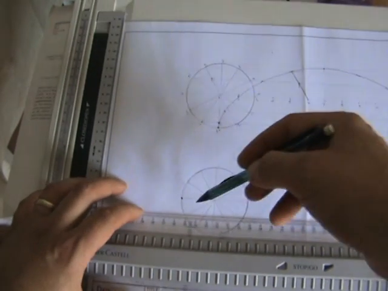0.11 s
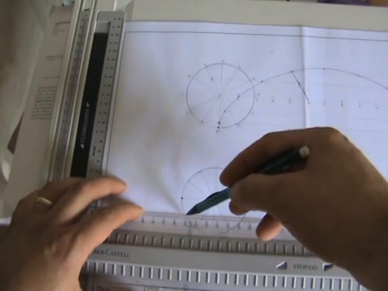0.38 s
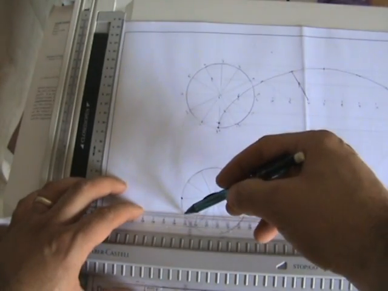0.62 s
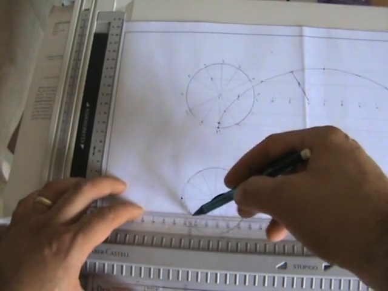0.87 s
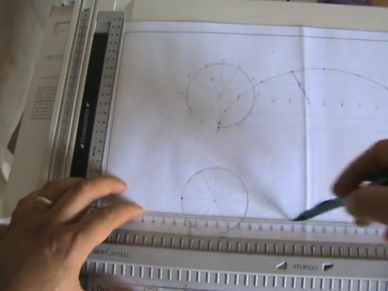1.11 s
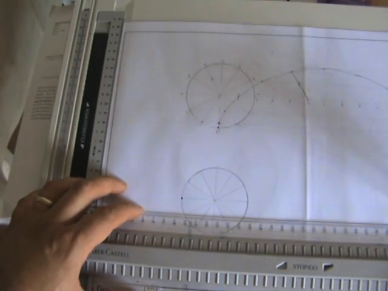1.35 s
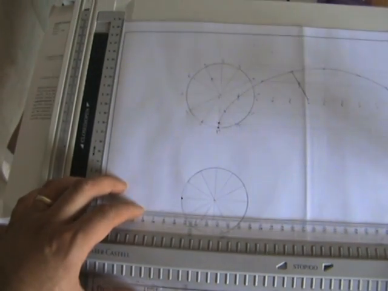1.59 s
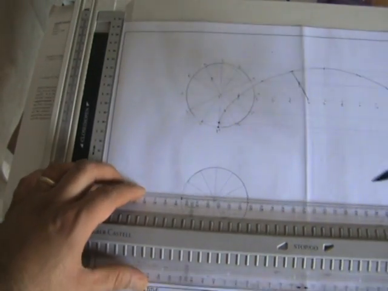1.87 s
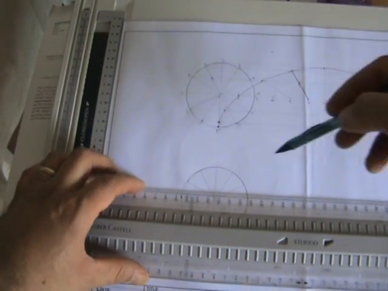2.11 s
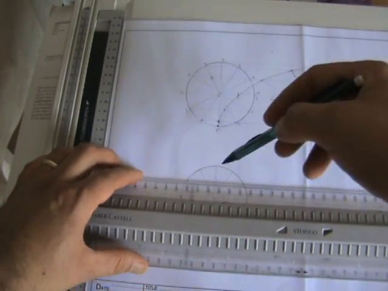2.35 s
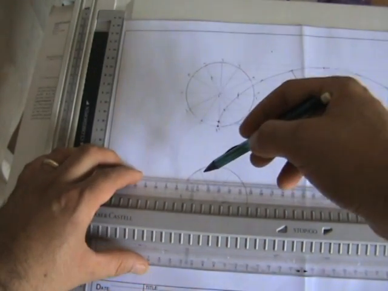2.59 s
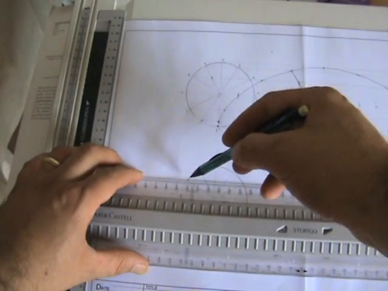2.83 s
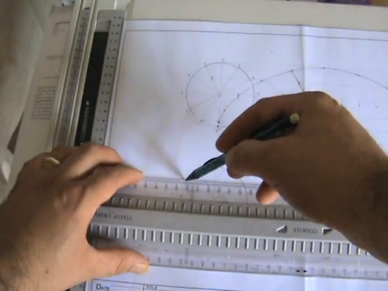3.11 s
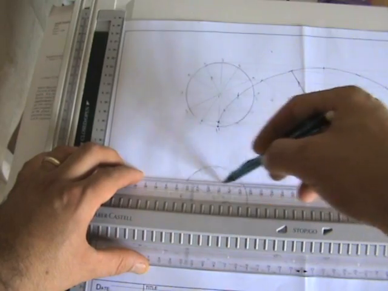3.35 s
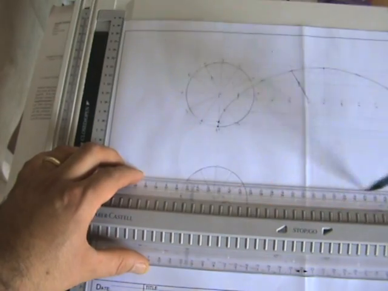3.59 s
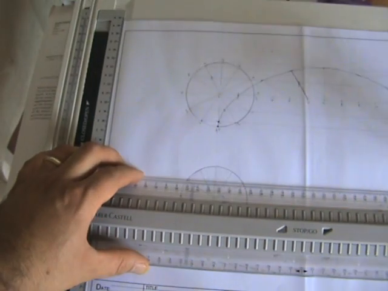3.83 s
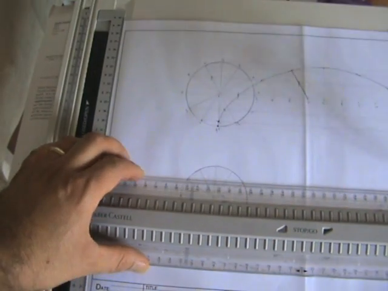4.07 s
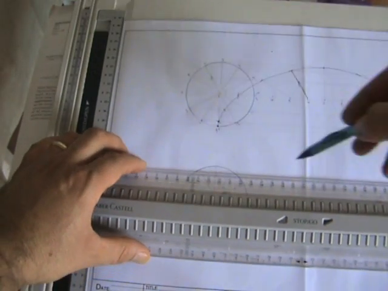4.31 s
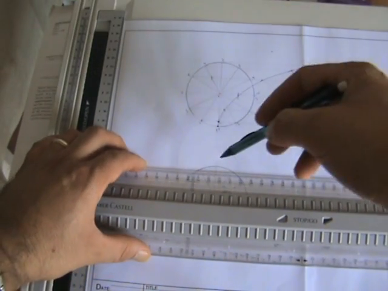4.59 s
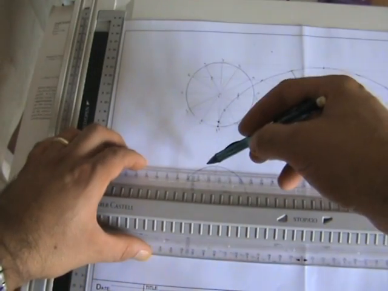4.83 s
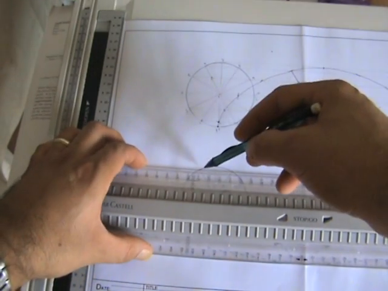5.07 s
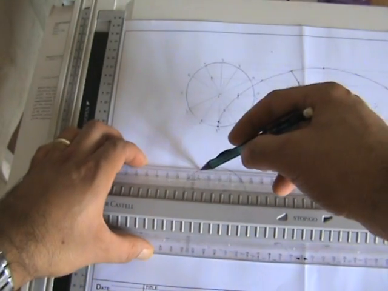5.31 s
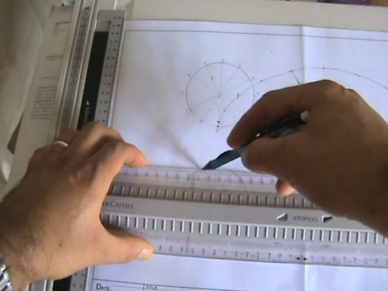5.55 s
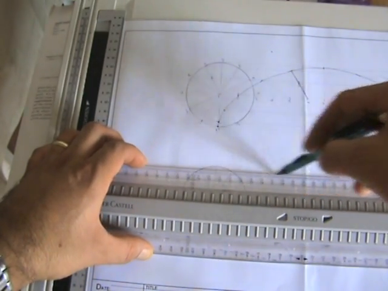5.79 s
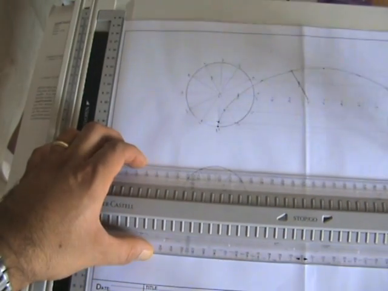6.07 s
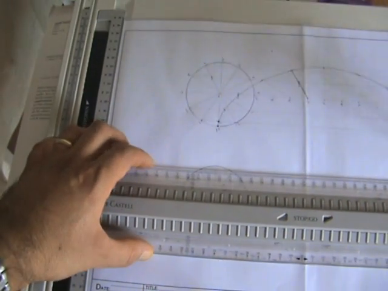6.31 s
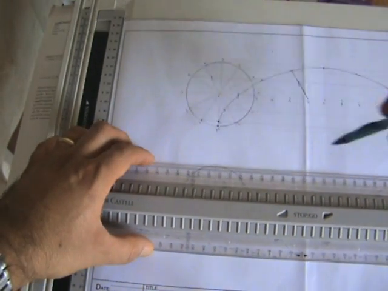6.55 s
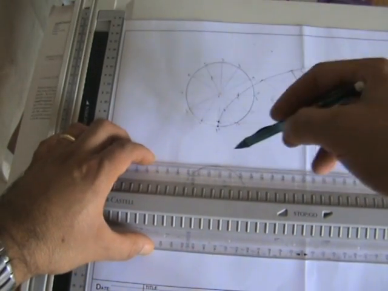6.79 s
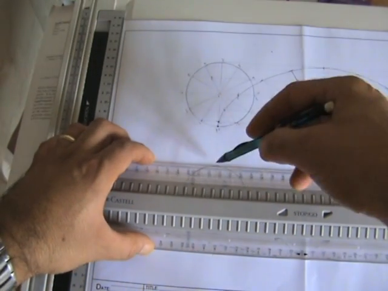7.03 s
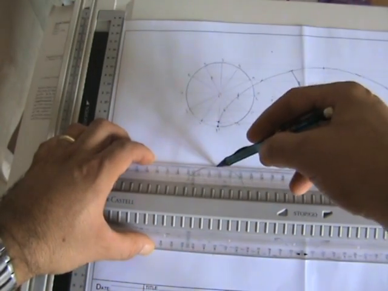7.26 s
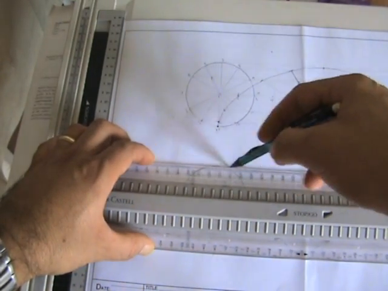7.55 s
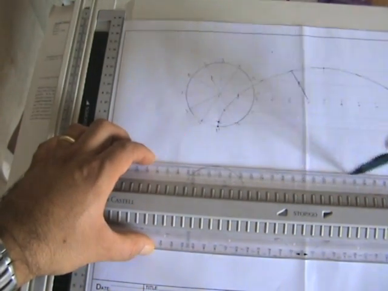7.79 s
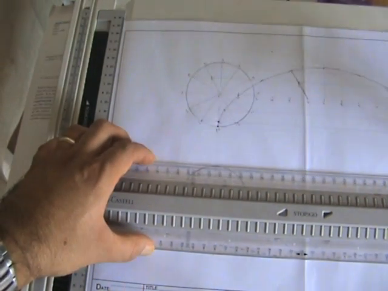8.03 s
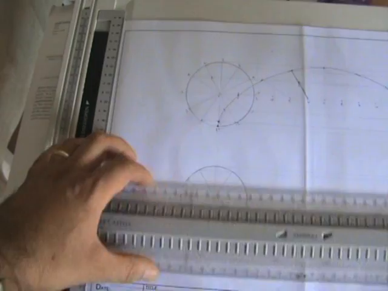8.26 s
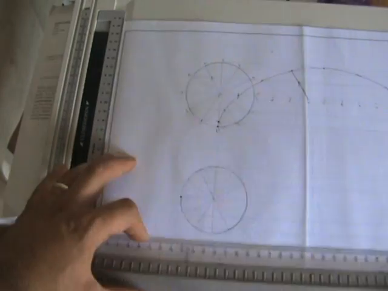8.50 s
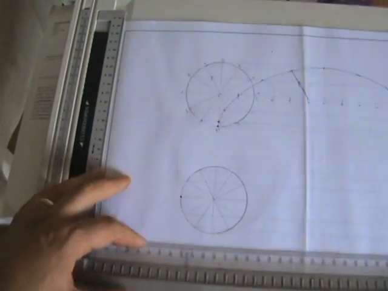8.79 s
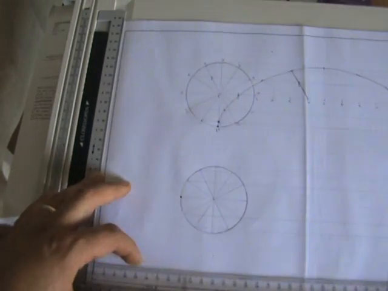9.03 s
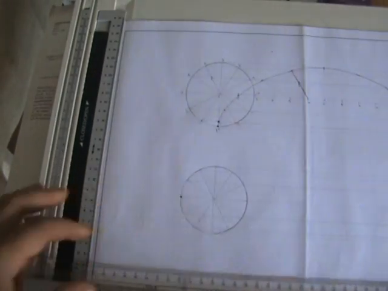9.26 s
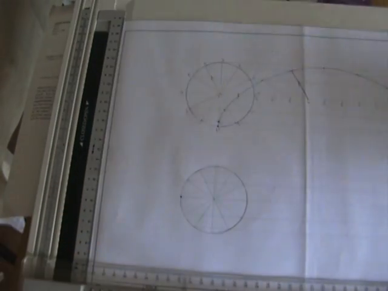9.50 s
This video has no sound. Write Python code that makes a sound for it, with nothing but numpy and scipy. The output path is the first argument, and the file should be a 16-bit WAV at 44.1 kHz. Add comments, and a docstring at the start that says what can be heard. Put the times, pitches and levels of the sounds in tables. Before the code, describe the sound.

In a quiet room, a pencil draws four brisk lines along a plastic ruler, each a grainy hiss with a hollow desk drone. Light ticks, soft rustles and small thumps fill the gaps as ruler and hand shift. Near the end the ruler slides and clatters more loudly. A close camera microphone adds faint motor hum and ticking; a dove coos softly far outside at the start.

```python
"""Pencil lines along a ruler

A pencil is drawn four times along a ruler on a drafting desk: tiny catches of the lead on paper drive desk and hiss.
Hand and ruler slide (more catches), with ticks and knocks (short chatter) and thumps (soft pushes) between them.
A quiet room answers with sparse dying taps. A camera's disc motor hums and ticks, and its lens drive steps.
A dove coos and an engine drones far outside, both made of wavering tones, over still air made of patchy noise."""
import sys
import numpy as np
from scipy import signal
from scipy.fft import rfft, irfft
from scipy.io import wavfile
from scipy.ndimage import uniform_filter1d

SR = 44100
rng = np.random.default_rng(int(sys.argv[2]) if len(sys.argv) > 2 else 0)


def digitize_waveform(pressure):
    """Quantize a signal to 16-bit integers and store it at the path in sys.argv[1].

    Rows of a 2-D input are taken as channels; values are limited to [-1, 1].
    """
    field = np.atleast_2d(pressure).T
    bounded = np.clip(field, -1, 1)
    quanta = np.round(bounded * 32767).astype(np.int16)
    wavfile.write(sys.argv[1], SR, quanta)


def how_loud(loudness_db):
    """Turn decibels into a plain amplitude multiplier (0 dB gives 1, 20 dB gives 10)."""
    steps = np.asarray(loudness_db, float) / 20
    return 10 ** steps


N = 424683

# what the desk top rings with: pitch_hz, width_hz (wider dies sooner), level_db (relative)
DESK = [(345, 53, -2), (423.8, 26.5, 6), (488.5, 60, -4.5), (665.6, 80, -4), (809, 112, -4),
        (914.5, 28.4, -2.5), (1006, 30.6, -5.5), (1256, 290, -16.5), (1530, 107, -21.5), (1850, 660, -36.5)]
# the whole board ringing on its legs: pitch_hz, width_hz, level_db (relative)
BOARD = [(86, 29, -30), (101, 16.6, 0.5), (145, 3.7, -2.5), (183, 28, -3), (253, 8.9, 5), (285, 11, -2)]
DISC_HZ = 31.7  # turns of the camera's disc a second


def evened(x):
    """Scales to rms 1."""
    return x / np.sqrt(np.mean(x ** 2) + 1e-20)


def smooth_noise(count, size):
    """Slowly wandering noise of rms 1: random values averaged twice over size samples."""
    return evened(uniform_filter1d(uniform_filter1d(rng.standard_normal(count), size), size))


def read(points, hz):
    """Reads a spectrum table between its points, on a log-frequency axis."""
    f, value = np.transpose(points)
    return np.interp(np.log(hz + 1), np.log(f + 1), value)


def add(mix, s, sound):
    """Mixes a sound in at time s."""
    part = mix[round(s * SR):][:len(sound)]
    part += sound[:len(part)]


def passed(x, hz, kind):
    """A steep high- or low-pass."""
    return signal.sosfilt(signal.butter(4, hz, kind, fs=SR, output="sos"), x)


def curves(rows):
    """Start time and the columns at sample rate; the last item fades both ends."""
    s, *columns = np.transpose(rows)
    t = np.arange(s[0], s[-1], 1 / SR)
    return s[0], *(np.interp(t, s, c) for c in columns), signal.windows.tukey(len(t), .08)


def swell(start, peak, end, depth_db, *levels_db):
    """Rows of a rounded rise to the levels at the peak and a rounded fall."""
    way = np.linspace(-1, 1, 9)
    times = np.interp(way, (-1, 0, 1), (start, peak, end))
    return [(s, *(db - depth_db * w ** 2 for db in levels_db)) for s, w in zip(times, way)]


def ring(modes, size=4000):
    """A body's answer to one sharp tap: dying sine modes, neighbours in opposite phase, energy 1."""
    t = np.arange(size) / SR
    h = np.zeros(size)
    for k, (f, w, db) in enumerate(modes):
        h += (-1) ** k * how_loud(db) * w * np.exp(-np.pi * w * t) * np.sin(2 * np.pi * f * t)
    return h / np.linalg.norm(h)


def colour(x, points):
    """Filters by a spectrum table, unit power gain."""
    hz = np.linspace(0, SR / 2, 257)
    # the minimum-phase step takes a square root, so the levels are doubled first
    h = signal.minimum_phase(signal.firwin2(511, hz, how_loud(2 * read(points, hz)) * (hz < SR / 2), fs=SR))
    return signal.oaconvolve(x, h / np.linalg.norm(h))[:len(x)]


def noise(points, same, patchy_db):
    """Two-channel random short-time spectra with drifting patches; same gives left-right likeness."""
    frames, hz = N // 256 + 5, np.fft.rfftfreq(1024, 1 / SR)
    a, b, c, d, patches = rng.standard_normal((frames, 513, 5)).T
    patches = evened(uniform_filter1d(uniform_filter1d(patches, 10, 0), 12, 1))
    likeness = np.clip(same(hz), -1, 1)[:, None]
    left = a + 1j * b
    right = likeness * left + np.sqrt(1 - likeness ** 2) * (c + 1j * d)
    z = np.array([left, right]) * how_loud(read(points, hz)[:, None] + patchy_db * patches)
    return evened(signal.istft(z, nperseg=1024, noverlap=768)[1][:, :N])


def patchy(x, spread_db):
    """Uneven paper: bands some hundred Hz wide swell and fade within tens of milliseconds."""
    z = signal.stft(x, nperseg=256)[2]
    patches = evened(uniform_filter1d(uniform_filter1d(rng.standard_normal(z.shape), 4, 0), 14, 1))
    return evened(signal.istft(z * how_loud(spread_db * patches), nperseg=256)[1][:N])


def tones(tables):
    """Near-pure wavering tones from rows of time, pitch and the level of each multiple."""
    out = np.zeros(N)
    for rows in tables:
        s, hz, *levels_db, fade = curves(rows)
        turn = 2 * np.pi * np.cumsum(hz) / SR
        wave = sum(how_loud(db) * np.sin(k * turn) for k, db in enumerate(levels_db, 1))
        add(out, s, np.sqrt(2) * fade * wave)
    return out


def grit(per_s, spread_db, clump_db):
    """Tiny catches on paper fibres, of uneven size, coming in clumps."""
    happens = rng.random(N) < per_s / SR
    size = how_loud(spread_db * np.minimum(rng.exponential(1, N), 5)) * happens
    return evened(size * rng.choice([-1., 1.], N) * how_loud(clump_db * smooth_noise(N, 500)))


def travelling(x, modes, drift_db):
    """As the point moves along the desk, each mode is driven more or less strongly."""
    knots = rng.standard_normal((len(modes), N // 3000 + 2))
    t = np.arange(N) / 3000
    out = np.zeros(N)
    for k, ((f, w, db), drift) in enumerate(zip(modes, knots)):
        drive = x * how_loud(drift_db * np.interp(t, np.arange(len(drift)), drift))
        out += (-1) ** k * how_loud(db) * np.sqrt(w) * signal.oaconvolve(drive, ring([(f, w, 0)]))[:N]
    return evened(out)


def rub(tables, *bodies):
    """One stream of catches sounds in several bodies, each at its own level."""
    out = np.zeros(N)
    for rows in tables:
        s, *levels_db, fade = curves(rows)
        at = slice(round(s * SR), round(s * SR) + len(fade))
        add(out, s, fade * sum(how_loud(db) * body[at] for db, body in zip(levels_db, bodies)))
    return out


def room(direct, sent):
    """Direct sound, wall echoes, and sparse taps dying band by band, other taps for each side."""
    # how long each band takes to die by 60 dB: pitch_hz, time_s
    dying = [(150, 0.39), (500, 0.37), (1500, 0.53), (4000, 0.54), (8000, 0.41), (14000, 0.36)]
    # near walls: delay_s, level_db (against the sound sent to the room)
    walls = [(0.017, -14), (0.028, -22)]
    taps = np.zeros((2, SR))
    at = np.arange(300, SR - 20, 20) + rng.integers(0, 20, (2, (SR - 301) // 20))
    np.put_along_axis(taps, at, rng.choice([-1., 1.], at.shape), 1)
    hz, t, z = signal.stft(taps, SR, nperseg=256)
    tail = signal.istft(z * how_loud(-60 * t / read(dying, hz)[:, None]), SR, nperseg=256)[1]
    tail = (tail + 0.22 * tail[::-1]) / np.linalg.norm(tail[0])  # each side leaks into the other
    for s, db in walls:
        tail[:, round(s * SR)] += how_loud(db)
    both = direct + signal.oaconvolve(sent[None], tail, axes=1)[:, :N]
    return both * how_loud(np.array([[-.75], [.75]]))  # dB: the desk lies a little to the right


def air():
    """Still air: steady noise with a coloured spectrum, its bands partly shared by the two sides."""
    # spectrum of the still air: pitch_hz, level_db (per Hz, relative)
    spectrum = [(35, -1), (60, -17), (164, -1.5), (293, -6.5), (416, -5), (678, -5), (1430, -6),
                (2130, -12.5), (3240, -15.5), (3810, -17.5), (14700, -25), (15800, -19.5)]
    # left-right likeness: pitch_hz, likeness (-1 to 1)
    sides = [(60, -0.046), (130, 0.46), (290, 0.26), (640, -0.64), (1410, -0.71), (3100, -0.47),
             (6820, 0.14), (15000, 0.59)]
    return how_loud(-55) * noise(spectrum, lambda hz: read(sides, hz), 1.37)  # dB rms


def far():
    """The far engine, a firing tone with its second multiple, and low drones that swell and fall."""
    # far engine: time_s, firing_hz, level_db (rms), second_multiple_db (rms)
    engine = [(1.0, 54.7, -72, -89), (2.2, 67, -70, -78), (2.8, 66.5, -70, -91), (3.8, 68, -66.5, -108),
              (4.7, 70.4, -75, -75), (5.7, 76, -62.5, -63), (6.1, 80.2, -75, -76), (7.0, 84.6, -70, -67),
              (7.2, 87.1, -72, -58.5), (7.5, 86, -68, -68), (7.75, 81.6, -63, -70), (8.2, 78, -93, -68)]
    # low drones: start_s, peak_s, end_s, pitch_hz, peak_level_db (rms)
    drone_rows = [(0.0, 0.5, 1.1, 54, -67), (4.1, 4.18, 4.3, 50.3, -63), (4.402, 5.25, 5.9, 50.5, -64),
                  (5.794, 6.441, 6.8, 53.5, -72)]
    drones = []
    for start, peak, end, hz, top_db in drone_rows:
        rows = swell(start, peak, end, 12, top_db)  # begins and ends 12 dB down
        drones.append([(s, hz, db) for s, db in rows])
    return tones([engine, *drones])


def disc_hum():
    """The turning disc hums: steady sines at multiples of its turning rate."""
    # hum of the disc motor: multiple (of the turning rate), level_db (rms)
    multiples = [(1, -80), (3, -72), (5, -76), (7.5, -80)]
    t = np.arange(N) / SR
    return sum(np.sqrt(2) * how_loud(db) * np.sin(2 * np.pi * (k * DISC_HZ * t + rng.random()))
               for k, db in multiples)


def disc_writing():
    """While the disc is written it hisses, and its head rings twice a turn, strong then weak."""
    # hiss of the writing: pitch_hz, level_db (per Hz, relative)
    hiss = [(1500, -37), (3000, -1), (6000, -3), (10500, 2), (12000, 1), (15800, -6)]
    # what the head rings with: pitch_hz, width_hz, level_db (relative)
    head_modes = [(10200, 130, -4), (10900, 98, -1), (14000, 200, -5)]
    t, end_s = np.arange(N) / SR, 2.925
    half = np.floor(2 * DISC_HZ * t)
    taps = np.diff(half, prepend=0) * (1 - 0.71 * (half % 2))
    taps = taps + 0.021 * rng.standard_normal(N)
    head = how_loud(-69.5) * evened(signal.oaconvolve(taps, ring(head_modes))[:N])
    return (how_loud(-62) * noise(hiss, lambda hz: 0.12 + 0 * hz, 0.68) + head) * (t < end_s)


def lens_drive():
    """The lens drive takes 50 uneven steps a second, strong and weak in turn, each a short ring."""
    # loudness of the lens drive: time_s, level_db
    loudness = [(0, -77), (2.0, -72.5), (4.2, -71.5), (6.9, -75.5), (7.44, -68.5), (7.47, -97), (9.3, -88),
                (9.5, -69), (9.63, -73)]
    t = np.arange(N) / SR
    step = np.floor(50 * t).astype(int)
    count = step[-1] + 1
    size = how_loud(2.5 * rng.standard_normal(count) + 3 * (np.arange(count) % 2))
    hits = np.diff(step, prepend=0) * size[step]
    modes = [(3220, 120, 39.0), (3490, 51, -38)]  # pitch_hz, width_hz, level_db (relative)
    steps = evened(signal.oaconvolve(hits, ring(modes))[:N])
    return steps * how_loud(np.interp(t, *np.transpose(loudness)))


def camera():
    """Disc hum, writing noise and lens drive, heard at the camera itself without the room."""
    return disc_hum() + disc_writing() + lens_drive()


def dove():
    """Two soft coos: tones that start sharp and settle, made hoarse by a trembling level."""
    # coos: start_s, end_s, settled_pitch_hz, level_db (rms ahead of the hoarseness and the room)
    coo_rows = [(0.107, 0.207, 558, -62), (0.499, 0.705, 552, -59)]
    rise_s, settle_s, sharp, edge_db = 0.023, 0.055, 1.05, 14  # sharp: pitch ratio at the start
    coos = [[(a, sharp * hz, db - edge_db), (a + rise_s, sharp * hz, db), (a + settle_s, hz, db),
             (b - rise_s, hz, db), (b, hz, db - edge_db)] for a, b, hz, db in coo_rows]
    return tones(coos) * (1 + .5 * smooth_noise(N, 220))


def thumps():
    """A soft push sets the board and the low desk modes ringing; a quicker push sounds higher."""
    # the board jolted: time_s, peak_db (ahead of the room), push_length_s
    pushes = [(2.255, -50, 0.0038), (4.447, -40.5, 0.0014), (4.618, -52, 0.0018), (8.231, -43, 0.0052),
              (8.48, -39, 0.0051)]
    out, body = np.zeros(N), passed(ring(BOARD + DESK[:3], size=12000), 92, "high")
    for s, db, push_s in pushes:
        jolt = np.convolve(np.hanning(round(push_s * SR)), body)
        add(out, s, how_loud(db) * jolt / abs(jolt).max())
    return out


def chatter(start, shape):
    """Some milliseconds of contact noise, short in time yet nearly even over all pitches."""
    contact = start
    for _ in range(2):
        z = rfft(contact * shape)
        contact = irfft(z / abs(z))
    return contact * np.sqrt(shape)


def struck_ruler(modes, hz):
    """The ruler rings most near the struck pitch and its octave, modes far from both weaker."""
    octave_db, reach_db_per_octave = -7, 34
    struck = []
    for f, w, db in modes:
        octaves = np.log2(f / hz)
        near = max(-reach_db_per_octave * abs(octaves),
                   octave_db - reach_db_per_octave * abs(octaves - 1))
        struck.append((f, w, db + near))
    return passed(ring(struck, size=1024), .5 * hz, "high")


def ticks():
    """Chatter cracks, rings the ruler and knocks the desk; returns direct sound and the room's share."""
    # ticks and knocks of pencil and ruler: time_s, ruler_peak_db (ahead of low-pass and room),
    # ruler_pitch_hz (it rings around this), desk_knock_db, bright_crack_db (both against the ruler)
    tick_rows = [(0.035, -44, 1780, -18, -2), (0.092, -43, 1650, -21, -7), (0.465, -41.5, 1120, -4, -7),
                 (0.637, -46.5, 870, 1, -6), (0.716, -49, 1000, 1.5, 5.5), (1.54, -30.5, 1250, -15.5, -3.5),
                 (1.683, -46, 1100, -2.5, -13), (1.706, -40, 1840, -2, -7), (1.792, -48, 1770, -23, -4),
                 (1.948, -36, 933, -15, 1.5), (2.125, -51.5, 2000, -18, 6), (2.334, -48, 1820, -10, 3),
                 (2.594, -34, 937, -16, 3.5), (3.019, -44.5, 930, -12, -2), (4.023, -50, 3200, -20, 10.5),
                 (4.161, -48, 1720, -11, -6), (4.223, -48, 1860, -18, -3), (4.299, -53, 1850, -14, -8),
                 (4.447, -54.5, 900, 6.5, 10.5), (4.901, -41.5, 1760, -26, -1), (5.306, -45.5, 1150, -8, 3),
                 (5.942, -35.5, 945, 4.5, -2.5), (6.297, -48, 1820, -1, 2), (6.319, -49.5, 1600, 5.5, 2),
                 (6.407, -45.5, 1880, -11, 1), (7.216, -50, 1067, -4, -8), (8.226, -33.5, 1860, -0.5, 11.5),
                 (8.247, -34, 4470, -7, 5), (8.454, -28.5, 1700, -10, 2), (8.473, -24, 1410, -3, -6),
                 (8.489, -28, 1010, -1, -4.5), (8.508, -40, 990, -7, -5), (8.627, -52, 895, -19, 15),
                 (8.759, -45, 1780, -7, -5), (8.821, -48, 1870, -3, -7), (8.867, -41, 6500, -23, -5),
                 (8.94, -24.5, 5600, -12, 2.5), (9.111, -25.5, 4500, -8, 10),
                 (9.115, -29.5, 1400, -5, 13.5), (9.129, -22, 2600, -14.5, 4.5)]
    # what the ruler rings with: pitch_hz, width_hz, level_db (relative)
    ruler_modes = [(945, 94, -1), (1170, 120, -7.5), (1400, 83, -1.5), (1603, 84, 2.5), (1795, 91, 1.5),
                   (1960, 117, 2.5), (2360, 59, 2), (2710, 250, -3), (3270, 94, 0), (4260, 150, -3.5),
                   (5600, 220, -19), (6500, 750, -3), (8700, 230, -42)]
    # a hard tick: pitch_hz, level_db (per Hz, relative)
    crack = [(700, -28), (1500, -10), (3000, -2), (5500, -2), (7000, -4), (8700, 0), (10500, -4),
             (12500, -20), (16000, -32)]
    room_db, room_per_db, firm_db = -2, 0.22, -33.5  # harder ticks send a larger share to the room
    out, t = np.zeros((2, N)), np.arange(1024) / SR
    desk = passed(ring(BOARD[4:] + DESK), 104, "high")
    shape = np.minimum(t / .001, 1) * how_loud(-60 * (t / .022) ** 2)
    end_fade = signal.windows.tukey(2048, .5)[1024:]
    for s, db, hz, knock_db, crack_db in tick_rows:
        contact = chatter(rng.standard_normal(1024), shape)
        bodies = [signal.fftconvolve(contact, body)[:1024] for body in (struck_ruler(ruler_modes, hz), desk)]
        bodies.append(colour(contact, crack))
        levels_db = (0, knock_db, crack_db)
        tick = sum(how_loud(rel_db) * body / abs(body).max() for body, rel_db in zip(bodies, levels_db))
        add(out[0], s - .001, how_loud(db) * tick * end_fade)
        add(out[1], s - .001, how_loud(db + room_db + room_per_db * (db - firm_db)) * tick)
    return passed(out, 13600, "low")  # the ticks are dull above 13.6 kHz


def slides():
    """Hand, sleeve or ruler slides over paper: catches rustle, press on the desk and rumble the board."""
    # slides: start_s, peak_s, end_s, rustle_db, desk_weight_db (at the peak, ahead of the room);
    # a row that ends before it starts stays silent
    slide_rows = [(0.0, -0.03, 0.26, -54, -59.5), (1.55, 1.61, 1.8, -62, -70),
                  (1.68, 1.832, 2.12, -53.5, -62), (2.197, 2.354, 2.42, -58, -58),
                  (4.097, 4.243, 4.35, -58, -71), (5.3, 5.435, 5.73, -68, -62.5),
                  (6.2, 6.249, 6.29, -59, -48.5), (6.3, 6.33, 6.27, -52, -56),
                  (6.393, 6.408, 6.86, -63.5, -64.5), (6.46, 6.514, 6.1, -60, -65),
                  (8.21, 8.237, 8.24, -48, -51), (8.16, 8.421, 8.48, -45.5, -52.5),
                  (8.458, 8.44, 8.66, -42.5, -46), (8.723, 8.75, 8.78, -62, -88),
                  (8.758, 8.94, 8.94, -47, -55.5), (9.36, 9.43, 9.52, -62.5, -66)]
    # skin and plastic on paper: pitch_hz, level_db (per Hz, relative)
    rustle_spectrum = [(600, -7.5), (1200, 13.5), (2000, 10), (4000, 10.5), (8000, 9), (11000, 1),
                       (15800, -17)]
    swell_db, rumble_db = 27, -7  # dB under the peak at both ends; board against desk
    skin = grit(4000, 3, 2)
    sweeps = [swell(*times, swell_db, rustle, weight, weight + rumble_db)
              for *times, rustle, weight in slide_rows]
    rustling = patchy(colour(skin, rustle_spectrum), 0.71)
    return rub(sweeps, rustling, *(signal.oaconvolve(skin, ring(modes)) for modes in (DESK, BOARD)))


def squeal():
    """The ruler edge squeals on paper: a high gliding sine with a fuzzy level."""
    # squeal: time_s, level_db (ahead of fuzz and room), pitch_hz
    glide = [(8.28, -68, 15400), (8.412, -53, 14600), (8.5, -66, 14800)]
    out = np.zeros(N)
    s, db, hz, fade = curves(glide)
    fuzz = smooth_noise(len(db), 25)
    add(out, s, fade * how_loud(db) * fuzz * np.sin(2 * np.pi * np.cumsum(hz) / SR))
    return out


def pencil_lines():
    """The lead catches on paper grain: the catches hiss and make the desk drone low and buzz higher."""
    # one table a pencil line: time_s, low_desk_drone_db, higher_desk_buzz_db, lead_hiss_db
    # (levels ahead of the room)
    strokes = [
        [(0.84, -66, -66, -69), (0.94, -46, -55, -55), (1.028, -43, -43, -48.5), (1.226, -42, -37, -42),
         (1.336, -43, -34.5, -44.5), (1.36, -40, -36.5, -47), (1.44, -42, -44, -49), (1.526, -51.5, -48, -58),
         (1.535, -54, -56, -51)],
        [(3.19, -96, -89, -78), (3.268, -56, -57.5, -60), (3.436, -43, -40, -50), (3.478, -51, -40, -45.5),
         (3.608, -37.5, -36.5, -42.5), (3.744, -41.5, -47, -46.5), (3.836, -45, -39.5, -49.5),
         (3.872, -60, -65, -65), (3.97, -62, -66, -71)],
        [(5.55, -68, -72, -66), (5.694, -42.5, -47, -53.5), (5.712, -49, -52, -56), (5.756, -47.5, -49, -54.5),
         (5.924, -44.5, -49.5, -46), (5.95, -41.5, -37.5, -46), (6.136, -42.5, -39, -44),
         (6.226, -57, -67, -73), (6.24, -56, -51, -55)],
        [(7.48, -64, -81, -80), (7.522, -58.5, -63, -67.5), (7.67, -43.5, -45.5, -50.5),
         (7.836, -50, -39.5, -41.5), (7.96, -40, -36.5, -46), (8.008, -43.5, -46, -47.5),
         (8.062, -45, -40.5, -51), (8.18, -70, -64, -61), (8.2, -68, -60, -52)],
    ]
    # lead on paper grain: pitch_hz, level_db (per Hz, relative)
    lead_spectrum = [(740, -15), (1250, 3.5), (1400, 6), (2170, -3.5), (3460, -6.5), (6080, -7.5),
                     (7200, -8.5), (9800, -6.5), (12900, -25), (15800, -35)]
    lead = grit(4000, 1.64, 0.94)
    drone, buzz = (passed(travelling(lead, modes, 2), 230, "high") for modes in (DESK[:3], DESK[3:]))
    hiss = patchy(colour(lead, lead_spectrum), 1.6)
    return rub(strokes, drone, buzz, hiss)


def scene():
    """Desk sounds and the dove in the room, over the still air, the camera and the far engine."""
    rubbing = pencil_lines() + slides() + squeal() + thumps() + dove()
    in_room = room(rubbing, how_loud(-4.5) * rubbing) + room(*ticks())
    return in_room + air() + camera() + far()


def low_pass(x):
    """Removes everything above the highest recorded frequency."""
    return signal.sosfilt(signal.butter(12, 16630, fs=SR, output="sos"), x)


def record(dry):
    """Limits the band to 15800 Hz and returns the finished sound."""
    limited = signal.oaconvolve(dry, signal.firwin(255, 15800, fs=SR)[None], "same")
    return low_pass(limited)


dry = scene()
out = record(dry)
digitize_waveform(out)
```